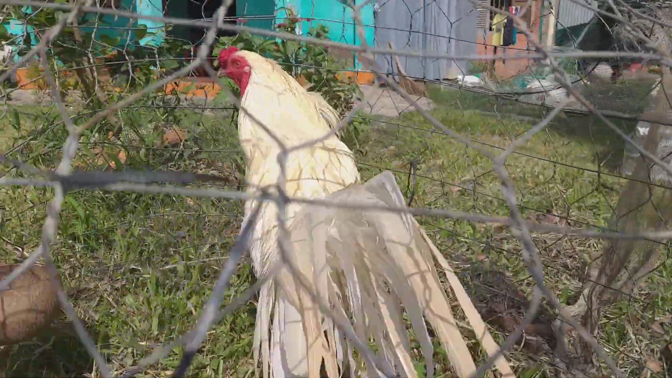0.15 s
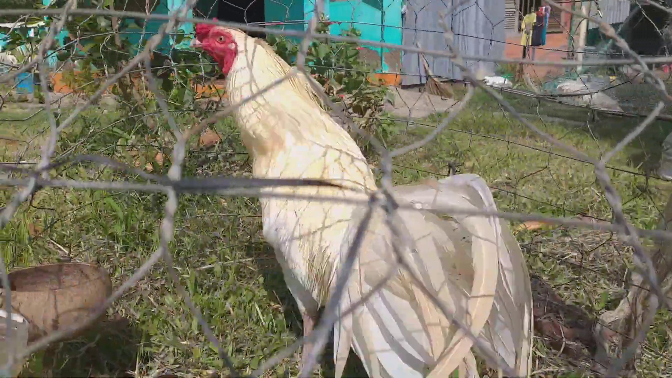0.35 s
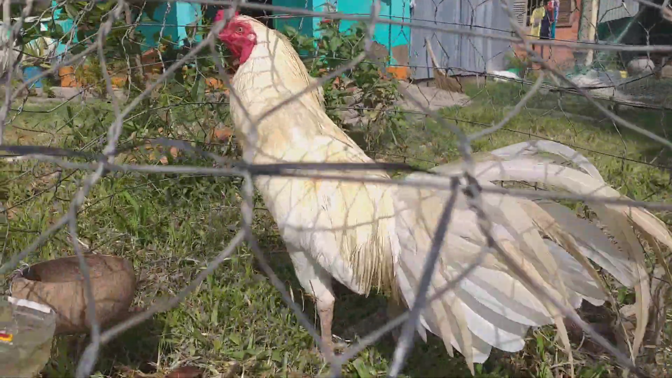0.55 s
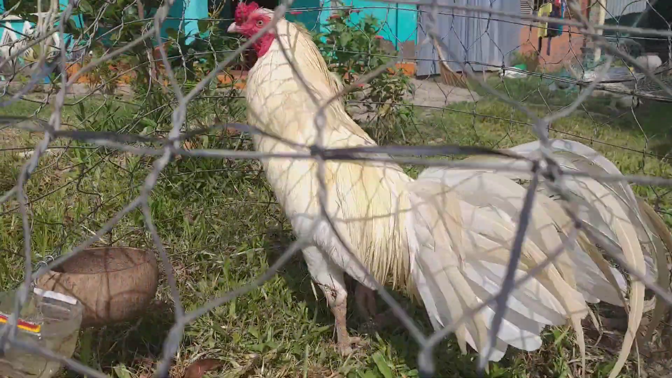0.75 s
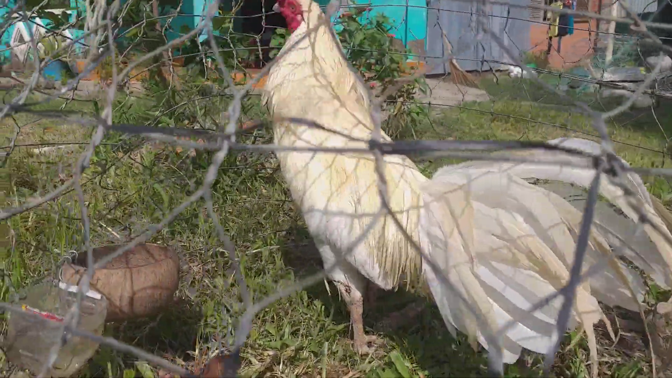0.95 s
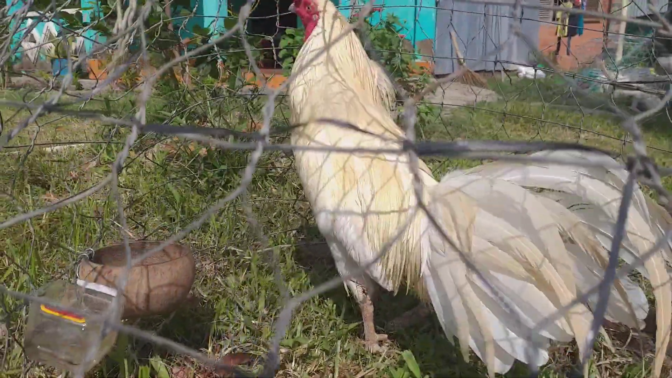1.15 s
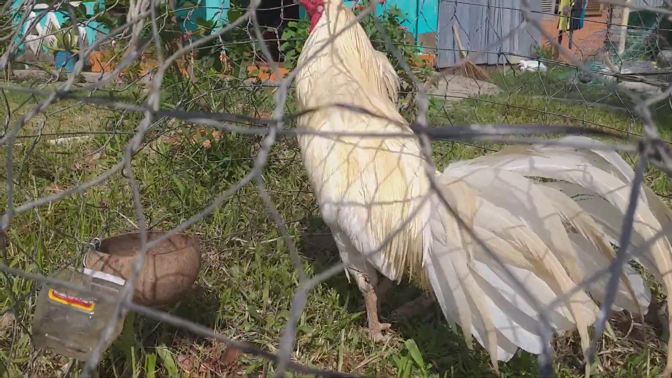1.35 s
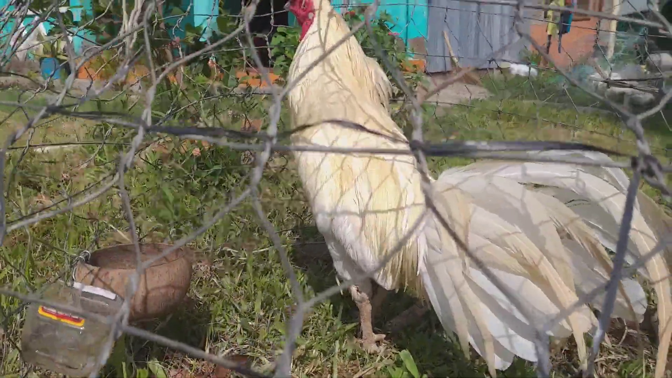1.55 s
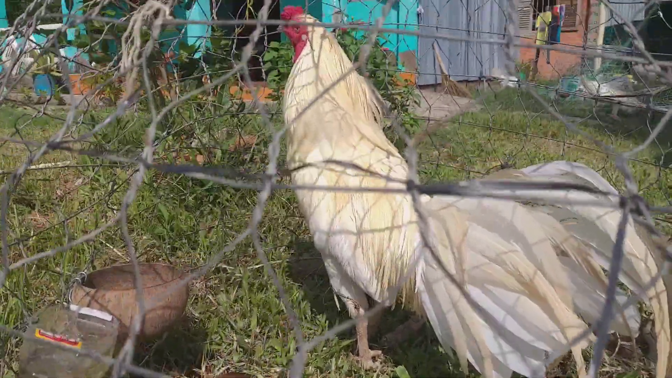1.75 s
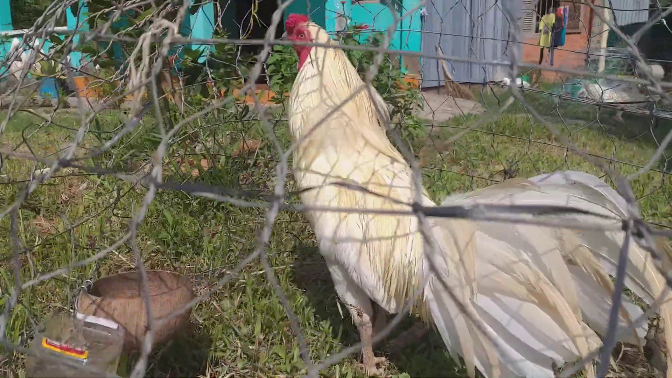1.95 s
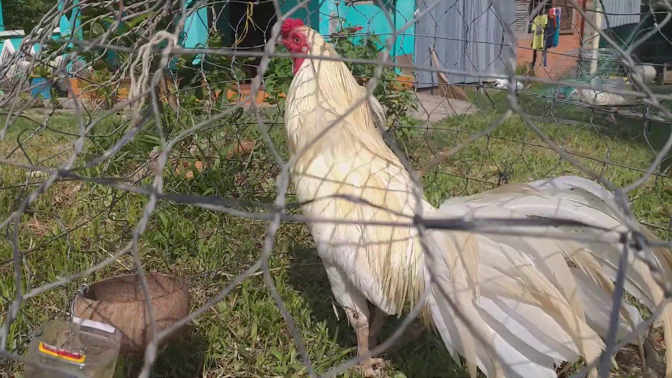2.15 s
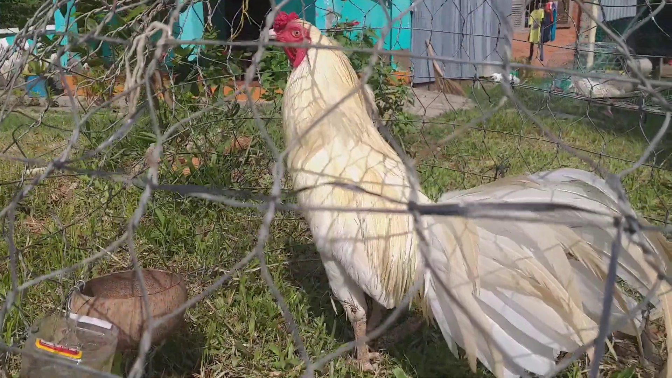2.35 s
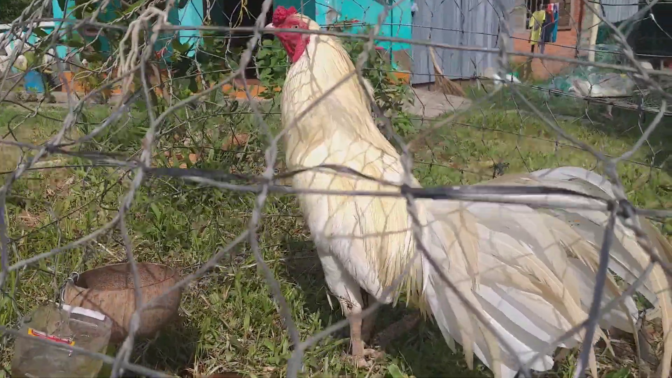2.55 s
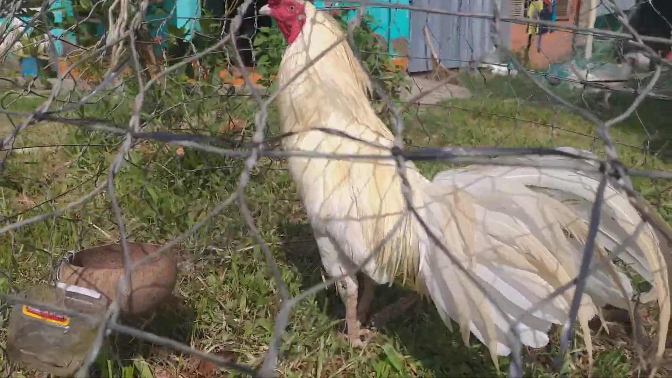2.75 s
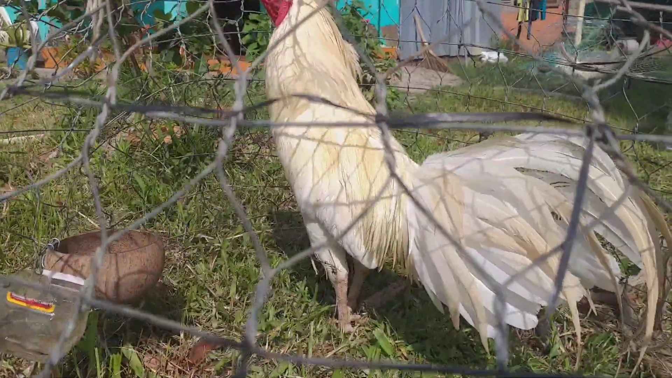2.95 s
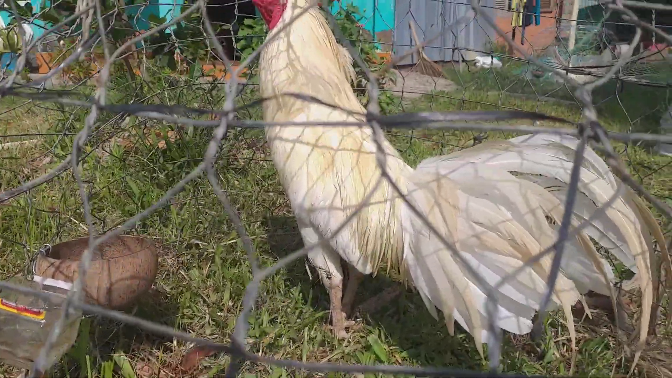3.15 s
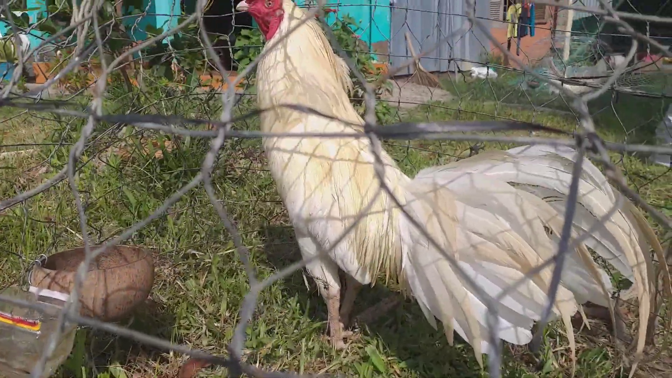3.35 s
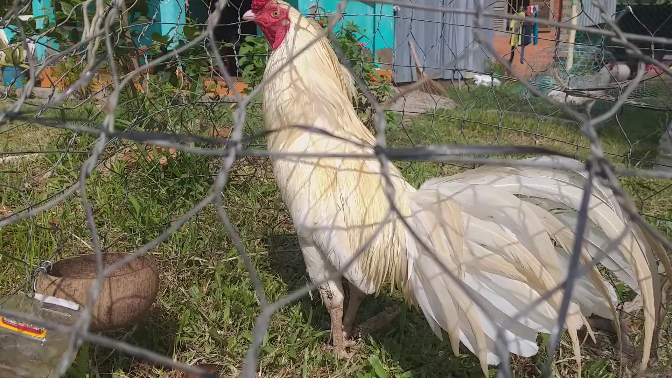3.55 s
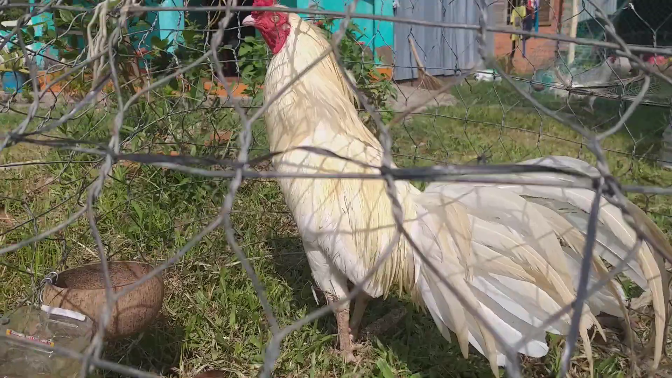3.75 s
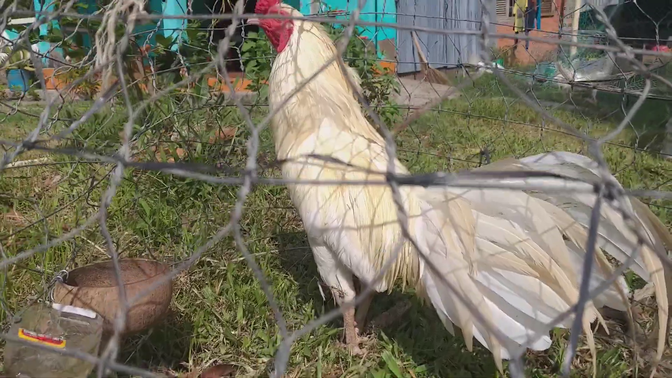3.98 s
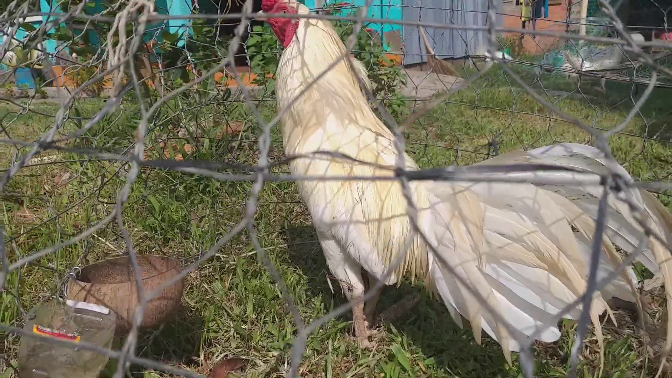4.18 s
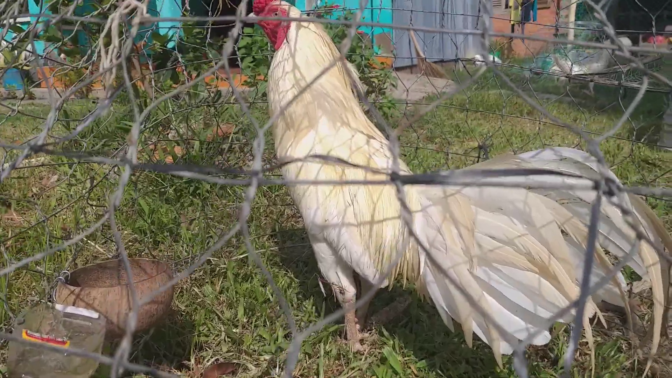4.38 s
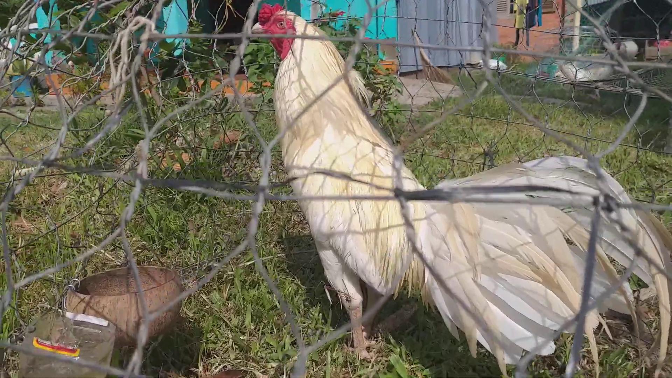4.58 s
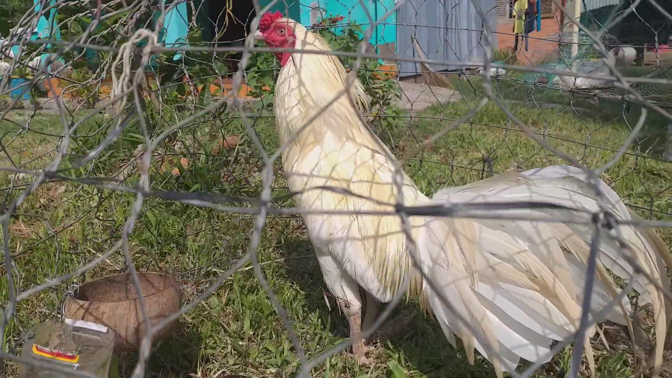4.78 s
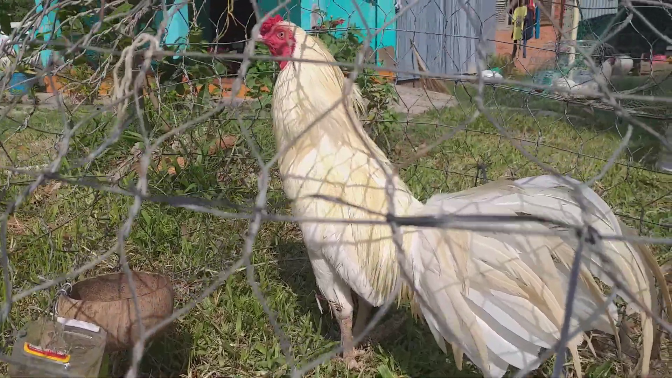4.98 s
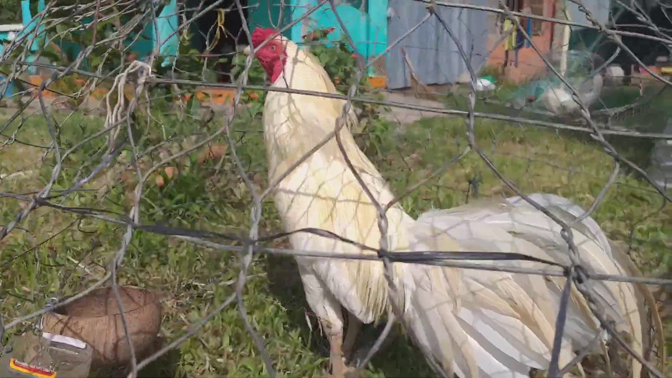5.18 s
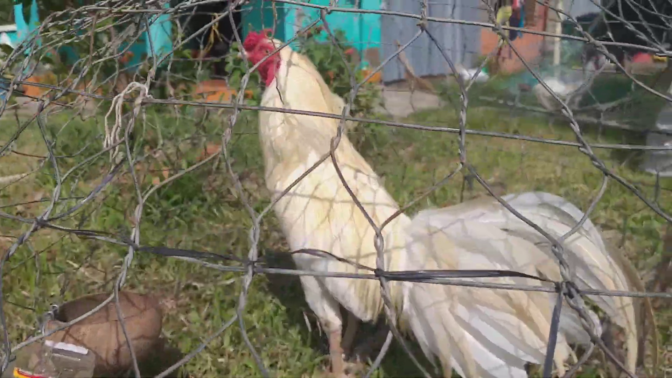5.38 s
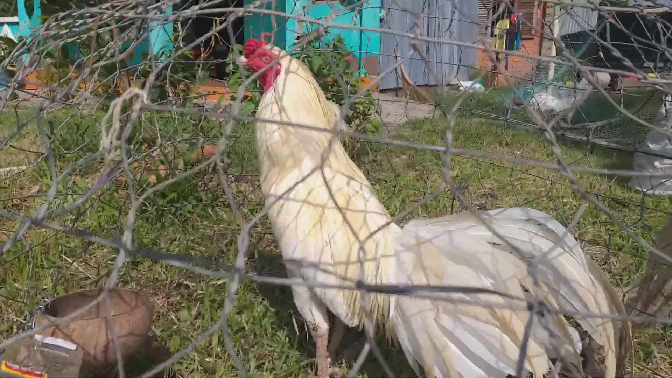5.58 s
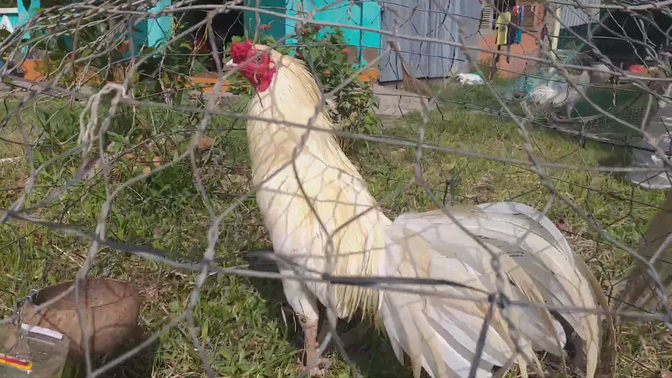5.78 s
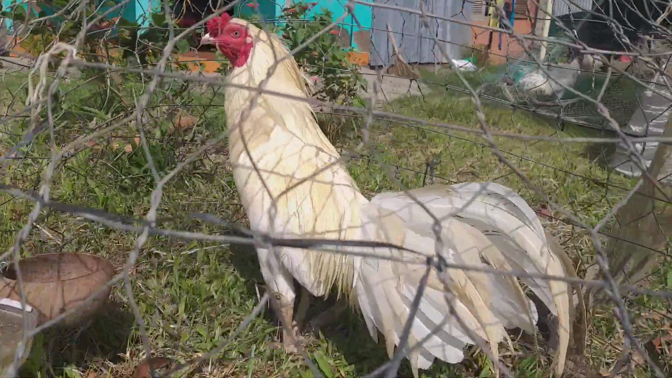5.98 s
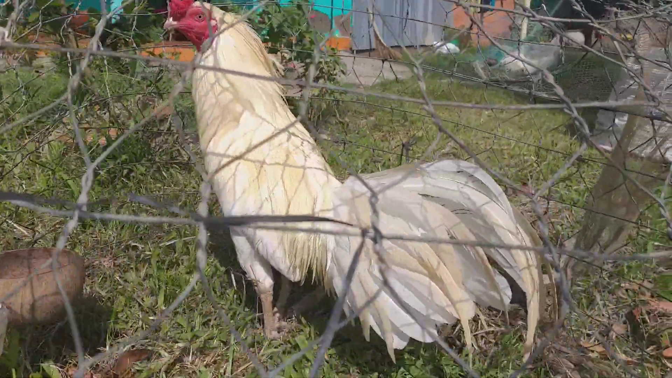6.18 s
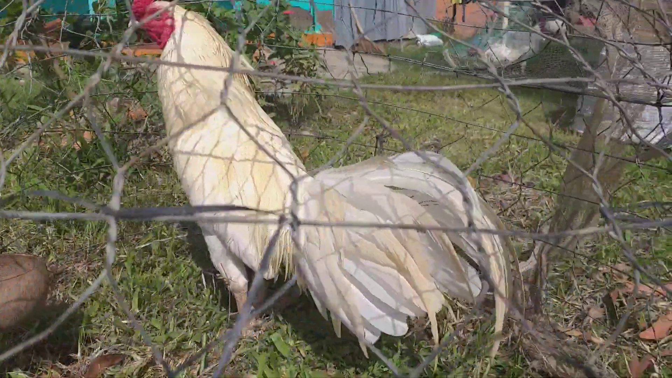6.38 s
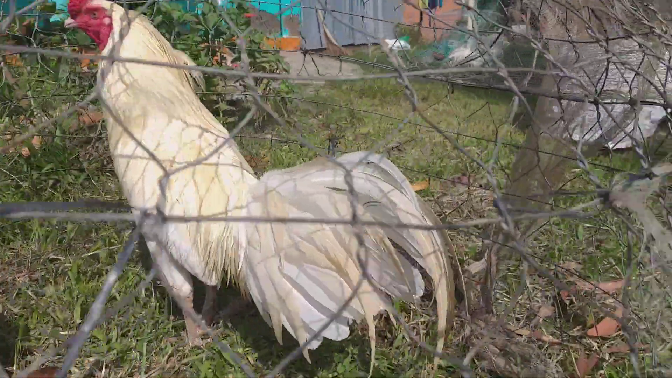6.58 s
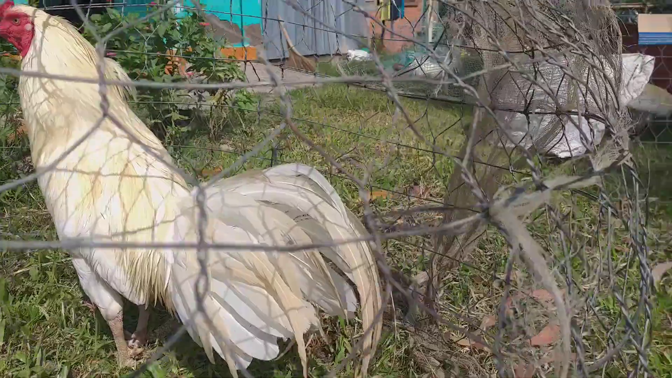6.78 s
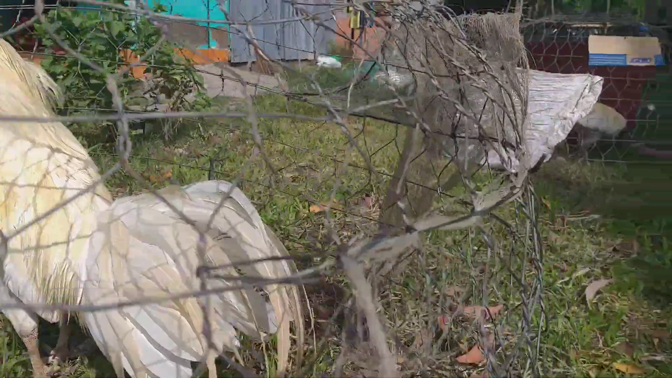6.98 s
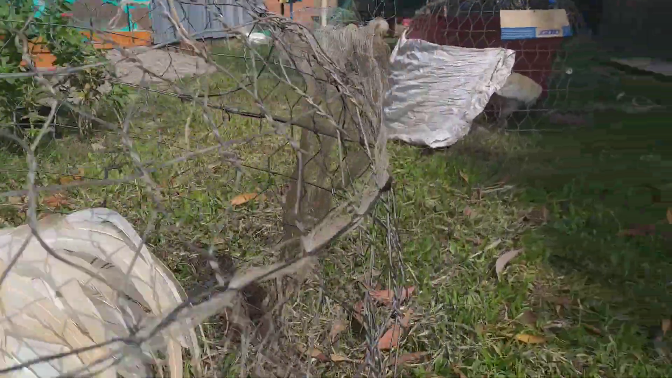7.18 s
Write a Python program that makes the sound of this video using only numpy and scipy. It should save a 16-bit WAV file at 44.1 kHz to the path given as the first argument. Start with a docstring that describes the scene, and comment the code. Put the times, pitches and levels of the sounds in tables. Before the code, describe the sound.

One loud three-note rooster crow outdoors, its tail drooping and echoing faintly, followed by dry rustling, sharp snaps, fence knocks and a tiny bird chirp.

```python
"""Over the hum of a grassy yard, a rooster a metre from a phone crows one three-note crow.
Its voice is a stack of harmonics with short hoarse breaks and breath; it ends in a sinking coo, and sheds echo it.
Then dry grass and feathers rustle and snap as grainy noise, and air puffs thump as low pressure swings.
The wire fence is knocked and rattles: noise bursts, a post thud and ringing wires.
Later a small bird chirps in quick glides, and near the end a wavering far tone hangs over the yard."""
import sys
import numpy as np
from scipy import signal
from scipy.fft import rfft, irfft, next_fast_len
from scipy.io import wavfile
from scipy.ndimage import uniform_filter1d

SR = 44100
rng = np.random.default_rng(int(sys.argv[2]) if len(sys.argv) > 2 else 0)


def nominal_scale(level):
    """Amplitude ratio for a level in decibels (scalar or array-like)."""
    x = np.asarray(level, float) / 20
    return 10 ** x


def transcribe(signal):
    """Save signal, clipped to [-1, 1], as a 16-bit WAV file at the path in sys.argv[1]."""
    frames = np.atleast_2d(signal).T
    limited = np.clip(frames, -1, 1)
    pcm = np.round(limited * 32767).astype(np.int16)
    wavfile.write(sys.argv[1], SR, pcm)


N = 318738
T = np.arange(N) / SR


def level(x, db):
    """Set the average loudness (rms)."""
    return x * nominal_scale(db) / np.sqrt(np.mean(x ** 2))


def colour(x, points):
    """Make some pitches louder than others, by points of (pitch_hz, gain_db)."""
    hz, db = np.transpose(points)
    size = next_fast_len(len(x) + 4096)
    f = np.maximum(np.arange(size // 2 + 1) * SR / size, 1)
    gain = nominal_scale(np.interp(np.log(f), np.log(hz), db))
    return irfft(rfft(x, size) * gain, size)[:len(x)]


def curves(tables):
    """Draw table columns along time, with a gate that is open from first row to last."""
    s, *columns = np.transpose(sorted(row for table in tables for row in table))
    gate = (T >= s[0]) & (T < s[-1])
    return [np.interp(T, s, c) for c in columns], uniform_filter1d(gate * 1., size=151)


def walk(rate):
    """Smooth chance with spread 1 that turns about rate times a second."""
    k = int(SR / rate)
    smooth = uniform_filter1d(rng.standard_normal(N), k)
    return level(uniform_filter1d(smooth, k), 0)


def add(out, s, x):
    """Mix a short sound in at time s."""
    i = int(s * SR)
    out[i:i + len(x)] += x[:N - i]


def fade(t, t60):
    """Exponential decay that falls 60 dB in t60 seconds."""
    return np.exp(-np.log(1000) * t / t60)


def sweeps(rows):
    """Whistled glides: sines whose pitch moves in a straight line, with soft ends."""
    out = np.zeros(N)
    for a, b, from_hz, to_hz, db in rows:
        size = int((b - a) * SR)
        phase = 2 * np.pi * np.cumsum(np.linspace(from_hz, to_hz, size)) / SR
        add(out, a, nominal_scale(db) * np.hanning(size) * np.sin(phase))
    return out


# distant rumble: pitch_hz, relative_level_db
RUMBLE_COLOUR = [(20, -38), (40, -25), (64, -12.5), (98, -2.5), (152, -11), (184, -16.5), (228, -18),
                 (337, -26.5), (450, -33.5), (580, -63)]
# even air hiss: pitch_hz, relative_level_db
AIR_COLOUR = [(240, -36), (400, -6.5), (580, -7), (920, -9), (1300, -8.5), (2140, -14), (2780, -21),
              (3660, -15), (5550, -15.5), (7400, -15), (8700, -10), (9300, -30), (12500, -27.5),
              (15800, -35.5)]
RUMBLE_DB, AIR_DB = -59.5, -68  # rms


def hum():
    """Distant rumble that swells a little, and even air hiss: both are coloured noise."""
    rumble = colour(rng.standard_normal(N), RUMBLE_COLOUR) * nominal_scale(0.38 * walk(13.0))
    air = colour(rng.standard_normal(N), AIR_COLOUR) * nominal_scale(1.3 * walk(4.1))
    return level(rumble, RUMBLE_DB) + level(air, AIR_DB)


# stirs of grass and feathers; body (below 2.5 kHz) and top (above 9.5 kHz) are relative to the stir:
# start_s, end_s, start_level_db, end_level_db, body_db, top_db
STIRS = [(1.746, 1.975, -53.5, -54.5, -15, 1.5), (2.388, 2.56, -54.5, -66, -29, 2),
         (3.46, 3.556, -55, -81, -4.5, -8), (4.123, 4.714, -78, -65, -15, -13),
         (4.9, 5.162, -58, -71, -7.5, -8), (5.185, 5.45, -63, -42, -12, -5.5),
         (5.456, 5.607, -42.5, -37, -6.5, -5.5), (5.66, 5.945, -52.5, -44, -15.5, -3),
         (5.974, 6.261, -61.5, -57, -10.5, -0.5), (6.323, 6.47, -49, -58, -12, 1.5),
         (6.5, 6.96, -64, -51.5, -11.5, -5), (6.95, 7.09, -55.5, -63.5, -7, -7),
         (7.11, 7.23, -72, -67, -1.5, -9.5)]
# sound of the dry grass between body and top: pitch_hz, gain_db
GRASS_COLOUR = [(1470, -44), (2500, -15.5), (3110, -5.5), (3930, -4), (5600, -1), (8120, 0.5), (9200, -5),
                (12000, -60.5), (20200, -120)]
# loud snapping stalks: start_s, peak_db, centre_hz
STALK_SNAPS = [(1.9105, -25.5, 5335), (1.959, -28.5, 7590), (2.3955, -37, 8150), (2.4553, -36, 6880),
               (2.4962, -41, 7720), (3.477, -32, 5600), (3.4993, -33.5, 5590), (3.868, -47, 4430),
               (4.3829, -43, 5370), (4.6134, -37.5, 6920), (5.42, -31.5, 4198), (5.5089, -37, 6245),
               (5.6263, -19, 3860), (5.6432, -31, 4340), (5.681, -33, 8790), (5.9386, -31, 4610),
               (6.077, -26, 14060), (6.9022, -34, 8190), (6.9252, -34, 8460), (7.2005, -34, 7600)]
BREEZE_DB, BREEZE_BODY_DB, BREEZE_TOP_DB = -72, -5, -13.5  # grass that never rests
STIR_ATTACK_S, STIR_RELEASE_S = 0.045, 0.029


def rustle():
    """A hiss broken into uneven grains a few milliseconds long; single stalks snap on top."""
    stir, deep, bright = np.zeros((3, N))
    for a, b, from_db, to_db, body_db, top_db in STIRS:
        shape = nominal_scale(np.interp(T, [a, b], [from_db, to_db]))
        shape = shape * np.clip((T - a) / STIR_ATTACK_S, 0, 1)
        shape = shape * np.exp(-np.maximum(T - b, 0) / STIR_RELEASE_S)
        stir = stir + shape
        deep = deep + nominal_scale(body_db) * shape
        bright = bright + nominal_scale(top_db) * shape
    breeze = nominal_scale(BREEZE_DB + 2.5 * walk(9.9))
    grains = rng.standard_normal(N) * nominal_scale(2.1 * walk(500) + 2.2 * walk(30))
    middle = level(colour(grains, GRASS_COLOUR), 0)
    body = level(colour(grains, [(500, -19), (900, -10.0), (1500, 1.5), (2200, -0.5),
                                 (3000, -25.5), (3500, -57.5)]), 0)
    top = level(colour(grains, [(8500, -47.5), (9500, -19), (11000, -2.5), (12800, 1.5), (15800, -4.5)]), 0)
    out = (stir + breeze) * middle
    out = out + (deep + nominal_scale(BREEZE_BODY_DB) * breeze) * body
    out = out + (bright + nominal_scale(BREEZE_TOP_DB) * breeze) * top

    t = T[:1200]
    snaps = [(s, nominal_scale(db), hz) for s, db, hz in STALK_SNAPS]
    # small snaps at random moments stand above the rustle around them
    for i, u, v in zip(rng.integers(0, N, size=40), *rng.random((40, 2)).T):
        peak = (stir + breeze)[i] * nominal_scale(12.5 + 6.5 * u)
        snaps.append((T[i], peak, 7500 * (.8 + .3 * v)))
    for s, peak, hz in snaps:
        noise = rng.standard_normal(1200) * fade(t, 0.0051)
        snap = colour(noise, [(hz / 6, -29.5), (hz, 0), (hz * 1.6, -10)])
        add(out, s, peak * snap / np.abs(snap).max())
    return out


# the three notes of the crow: start_s, pitch_hz, second_harmonic_db, effort_db
CROW_NOTES = [
    [(0.008, 610, -34.5, -38.5), (0.02, 630, -21, -29), (0.038, 783, -20, -27), (0.048, 830.3, -17, -25.5),
     (0.09, 826, -15.5, -28), (0.11, 826, -15.5, -28.5), (0.146, 733.9, -23.5, -22),
     (0.16, 754, -38, -36.5), (0.176, 734, -31.5, -37.5), (0.185, 727, -39, -37)],
    [(0.192, 585.3, -38, -34), (0.21, 604, -20, -27.5), (0.228, 675.3, -30.5, -25),
     (0.24, 745.7, -17.5, -26.5), (0.338, 758.7, -17, -26.5), (0.452, 765.7, -18.5, -28.5),
     (0.51, 757, -22, -27.5), (0.522, 760.7, -16, -27), (0.73, 754.4, -19, -28),
     (0.75, 723.7, -26.5, -28.5), (0.774, 767, -32, -49), (0.835, 734.2, -38.5, -48.5)],
    [(0.845, 705.7, -22, -46), (0.863, 629.5, -25.5, -33.5), (0.881, 716, -23.5, -25.5),
     (0.897, 731, -13.5, -26.5), (0.913, 747, -17, -26.5), (0.933, 804.6, -23, -20),
     (1.003, 796, -23, -19.5), (1.073, 750.6, -14, -25.5), (1.105, 762.6, -17, -22),
     (1.117, 761.5, -25.5, -20.5), (1.123, 752.6, -23.5, -26), (1.155, 772, -17, -23),
     (1.207, 780.4, -22, -21), (1.335, 748.2, -15.5, -27), (1.369, 751.5, -13.5, -26.5),
     (1.523, 737.8, -21.5, -27), (1.635, 729.2, -23, -27), (1.697, 692.5, -26, -30),
     (1.707, 681, -29.5, -30), (1.713, 652, -31.5, -35.5), (1.729, 516.5, -36.5, -53),
     (1.737, 457, -56, -44.5)],
]
# throat resonances, heard above harmonic 4: pitch_hz, relative_level_db
THROAT_COLOUR = [(3400, -18), (3800, -13), (4300, -17), (5400, 4), (6400, -11.5), (7200, -8.5), (8200, -3),
                 (8900, -14), (9800, -27.5), (11500, -29.5), (13500, -21.5), (15500, -37.5)]
# the membranes lose their rhythm: start_s, end_s, roughness (0-1)
HOARSE_BREAKS = [(.008, .026, .22), (.026, .042, .08), (.118, .125, .08), (.125, .14, .02),
                 (.14, .198, .16), (.198, .238, .06), (.476, .491, .28), (.523, .531, .25),
                 (.628, .644, .17), (.738, .76, .28), (.845, .885, .17), (.885, .928, .04),
                 (1.712, 1.745, .12)]
# how neck and beak are held, levels above effort: start_s, harmonic_1_db, harmonic_3_db, harmonic_4_db,
# harmonics_above_8_db, raise of the lower throat resonances (share)
NECK_POSTURE = [(0, 3.5, 0, 11, -4.5, 0.042), (0.046, 7.5, -2, 8, -9, 0.0042),
                (.118, -2.5, -0.5, 6, -10.5, 0), (.19, 0.5, 1, 1.5, -3, 0.069),
                (.236, 2, -1, 3.5, -5, 0.014), (.84, -7.5, 0, -29.5, -4.5, 0),
                (1.299, -5.5, 7.5, -23, -5.5, 0.033), (1.62, -5, 2.5, -26, 1, 0.17),
                (1.712, 11.5, 3.5, -14.5, -1, 0.2)]
# loss at full roughness: harmonic_1_db, harmonic_2_db, harmonic_4_db
BREAK_LOSS = (-8.5, -17, -38.5)
# short gliding tones beside the crow's own harmonics, perhaps a second membrane:
# start_s, end_s, from_hz, to_hz, level_db before the head's colour
SIDE_GLIDES = [(.735, .795, 1000, 975, -29), (.738, .765, 2150, 1950, -33), (.855, .882, 1300, 1050, -27),
               (.855, .9, 1800, 2100, -35), (.472, .495, 1000, 1100, -22), (.627, .65, 1050, 1150, -26)]
NOTCH_HZ, NOTCH_WIDTH_HZ, NOTCH_DB = 2293, 130, -21  # throat valley that harmonic 3 crosses
RING_HZ, RING_WIDTH_HZ, RING_DB = 3050, 175, 23  # throat ring: harmonic 4, while strong, is weaker off it
# cycles are stronger and weaker in turn by this share, more so for a moment after a break
DOUBLING, DOUBLING_AFTER_BREAK, DOUBLING_S = .01, .8, .025


def rooster():
    """Harmonics on one membrane phase; breaks shake its period and size, breath hisses once a cycle."""
    (hz, second_db, effort_db), gate = curves(CROW_NOTES)
    start, *held = np.transpose(NECK_POSTURE)
    row = np.searchsorted(start, T, "right") - 1
    first, third, fourth, high, raised = (uniform_filter1d(a[row], size=441) for a in held)
    rough = sum(r * ((T > a) & (T < b)) for a, b, r in HOARSE_BREAKS)
    rough = uniform_filter1d(rough, size=220) + .005

    # the four lowest harmonics have levels of their own
    notch = NOTCH_DB * np.exp(-((3 * hz - NOTCH_HZ) / NOTCH_WIDTH_HZ) ** 2 - 6 * rough)
    ring = RING_DB * (np.exp(-((4 * hz - RING_HZ) / RING_WIDTH_HZ) ** 2) - 1) * (fourth > 0)
    low_db = (effort_db + first + BREAK_LOSS[0] * rough,
              second_db + BREAK_LOSS[1] * rough,
              effort_db + third + notch,
              effort_db + fourth + ring + BREAK_LOSS[2] * rough)
    shaken_hz = hz * (1 + .4 * rough * walk(650) + .0015 * walk(25))
    phase = 2 * np.pi * np.cumsum(shaken_hz) / SR
    tone = sum(nominal_scale(db) * np.cos((k + 1) * phase) for k, db in enumerate(low_db))

    # the throat shapes the higher harmonics
    mid_db, high_db = effort_db - 2.0, effort_db + high
    f, throat_db = np.transpose(THROAT_COLOUR)
    for orders, db in ((range(5, 9), mid_db), (range(9, 21), high_db)):
        stack, power = 0, 0
        for k in orders:
            # each high harmonic shimmers alone as the neck and beak move
            throat_hz = k * hz / (1 + raised * np.clip((9000 - k * hz) / 2000, 0, 1))
            gain = nominal_scale(np.interp(np.log(throat_hz), np.log(f), throat_db) + 3.3 * walk(9))
            flutter = 1 + 0.02 * k * walk(120)
            angle = k * phase + 0.47 * k * k + .09 * max(k - 11, 0) * walk(250)
            stack = stack + gain * flutter * np.sin(angle)
            power = power + gain ** 2
        tone = tone + nominal_scale(db) * stack / np.sqrt(power)

    keep = np.exp(-1 / (DOUBLING_S * SR))
    lingering = signal.lfilter([1 - keep], [1, -keep], rough)
    doubling = DOUBLING + DOUBLING_AFTER_BREAK * lingering
    tone = np.sqrt(2) * tone * (1 + doubling * np.cos(phase / 2))
    tone = tone * (1 + 0.42 * rough * walk(210))

    breath_colour = [(250, -12), (900, -8.0), (2200, -10.5)] + THROAT_COLOUR[1:]
    hiss = level(colour(rng.standard_normal(N), breath_colour), 0)
    breath = hiss * (nominal_scale(mid_db - 30.0) + nominal_scale(high_db - 25.5))
    breath = breath * nominal_scale(25 * rough) * (1 + 0.35 * np.cos(phase))
    # so small a head radiates little that is low, and the beak leaves gaps near 4 and 10 kHz
    head = [(200, -21.5), (300, -5), (400, -3.5), (520, 1.5), (3300, 1.5), (4200, -3), (5000, 0),
            (9100, 0), (9800, -5), (12000, -1.5)]
    return colour(gate * (tone + breath) + sweeps(SIDE_GLIDES), head) + coo()


# single echoes from ground and sheds: delay_s, level_db
SINGLE_ECHOES = [(.0031, -26.5), (.021, -15.5), (.047, -16), (.083, -25)]
YARD_T60_S, YARD_DB = 0.89, -59  # diffuse tail; its rms before it fades


def yard(x):
    """A few single echoes and a thin diffuse tail of fading noise."""
    t = T[:SR]
    tail = colour(rng.standard_normal(SR), [(500, 0.5), (1500, -5.0), (2300, 2.0), (3500, -2.5),
                                            (8000, -12.5), (16000, -23.0)])
    response = level(tail, YARD_DB) * fade(t, YARD_T60_S) * (t > .012)
    response[0] = 1  # the direct sound
    for lag, db in SINGLE_ECHOES:
        response[int(lag * SR)] += nominal_scale(db)
    return signal.fftconvolve(x, response)[:N]


COO_S, COO_HZ, COO_REST_HZ, COO_SETTLE_S = 1.733, 720, 548, 0.037  # start, first and resting pitch, glide
COO_DB, COO_T60_S, COO_HALF_DB = -33.5, 0.37, -27  # the undertone's level is relative to the coo


def coo():
    """The breath runs out on a faint, hoarse, sinking tone with a half-pitch undertone."""
    t = np.maximum(T - COO_S, 0)
    hz = COO_REST_HZ + (COO_HZ - COO_REST_HZ) * np.exp(-(t / COO_SETTLE_S) ** 2)
    hz = hz * (1 + np.minimum(.02 + t, .09) * walk(300))  # grows hoarser
    phase = 2 * np.pi * np.cumsum(hz) / SR
    half = nominal_scale(COO_HALF_DB) * np.minimum(t / 0.063, 1) ** 2 * fade(t, 1.156) * (t < .26)
    half = half * np.sin(np.pi * COO_REST_HZ * t)
    tone = np.minimum(t / 0.0062, 1) * fade(t, COO_T60_S) * np.sin(phase)
    return nominal_scale(COO_DB) * (tone + half)


# air puffs on the microphone: start_s, level_db, pitch_hz, rise_s
AIR_PUFFS = [(2.136, -40.5, 112, 0.011), (2.16, -41, 75.8, 0.01), (2.349, -56, 59, 0.0089),
             (2.433, -45.5, 131.7, 0.0066), (2.608, -45, 120.6, 0.015), (2.66, -43.5, 156, 0.025),
             (2.698, -43, 112, 0.017), (3.031, -46, 86.1, 0.0097), (3.059, -39, 141.6, 0.0061),
             (4.173, -54, 105, 0.01), (6.498, -49, 95, 0.03)]


def puffs():
    """A low pressure swing that rises and dies away, with turbulence riding on it."""
    out, t = np.zeros(N), T[:6000]
    for s, db, hz, rise in AIR_PUFFS:
        eddies = colour(rng.standard_normal(6000), [(20, -4), (60, 10.0), (300, 2.5), (450, -35.0)])
        swing = np.sin(2 * np.pi * hz * t) + level(eddies, -6.0)
        add(out, s, nominal_scale(db) * swing * (t / rise) * np.exp(1 - t / rise))
    return out


# knocks on the fence and their bounces, crack before colouring, tail relative to the crack:
# start_s, crack_db, post_thud_db, tail_db
FENCE_KNOCKS = [(2.66, -26, -24, -3.5), (2.6674, -23.5, -35, -0.5), (2.6769, -32, -47, -28.5),
                (2.6964, -16, -53, -22.5), (2.7134, -33.5, -60, -40), (3.425, -47.5, -43, -1),
                (4.7245, -32, -29, -45), (4.7306, -24.5, -32, -0.5), (4.7427, -22, -50, -38),
                (4.7619, -26, -52, -30), (6.4812, -19.5, -25.5, -6), (6.488, -13.5, -23.5, -9.5),
                (6.5044, -26, -52, -6), (6.5176, -19.5, -47, -37), (6.5326, -38, -44, -21)]
# wire modes, and how strongly each of the four struck places rings them:
# pitch_hz, t60_s, place_1_db, place_2_db, place_3_db, place_4_db
WIRE_MODES = [(1927, .4, -10, -10, -7, -12), (2225, .5, -16, 5, -14, -8), (3450, .45, -6, -14, -12, -5),
              (4522, .25, -8, -14, -12, -8), (5000, .5, -9, -12, -12, -16), (5453, .55, -11, 6, 6, -14),
              (5841, .6, -6, 0, -4, 1), (8990, .45, -8, -25, -16, -20), (10130, .35, -25, -25, -13, -14),
              (10800, .35, -25, -25, -16, -14), (12830, .5, -6, -25, -11, -11)]
# sound of the rattling mesh: pitch_hz, gain_db
RATTLE_COLOUR = [(350, -46), (600, -31.5), (833, -25.5), (1290, -21), (2260, -15), (2630, -12.5),
                 (5660, -7.5), (6490, -11.5), (9020, -19.5), (9650, -25), (13000, -22.5), (15800, -38)]
POST_HZ, POST_T60_S = 1960, 0.014
TREBLE_DB, TREBLE_DB_PER_S, TREBLE_MAX_DB = -4, 450, 7  # later bounces are brighter


def fence():
    """Each knock: a crack, a thud of the post, wire modes weighted by the struck place, the mesh rattling on."""
    out, top, t = np.zeros(N), np.zeros(N), T[:SR]
    f, t60, *place_db = np.transpose(WIRE_MODES)[:, :, None]
    rings, thuds = np.zeros((len(f), N)), np.zeros(N)
    # a pause over 0.3 s means the next struck place
    places = np.cumsum(np.diff(np.array(FENCE_KNOCKS)[:, 0], prepend=0) > .3) - 1
    for (s, db, thud_db, tail_db), place in zip(FENCE_KNOCKS, places):
        since = s - FENCE_KNOCKS[list(places).index(place)][0]
        treble_db = min(TREBLE_DB + TREBLE_DB_PER_S * since, TREBLE_MAX_DB)
        crack = 2.2 * fade(t, 0.015)
        tail = nominal_scale(tail_db) * fade(t, 0.66) * np.minimum(t / 0.008, 1)
        burst = nominal_scale(db) * rng.standard_normal(SR) * (crack + tail)
        add(out, s, burst)
        add(top, s, burst * nominal_scale(treble_db) * fade(t, 0.88))
        add(thuds, s, nominal_scale(thud_db) * np.sin(2 * np.pi * POST_HZ * t) * fade(t, POST_T60_S))
        ring = nominal_scale(place_db[place] + db + tail_db - 14) * np.sin(2 * np.pi * f * (s + t)) * fade(t, t60)
        add(rings.T, s, ring.T)
    rattle = colour(out * nominal_scale(2 * walk(248)), RATTLE_COLOUR) * nominal_scale(1)
    treble = colour(top, [(8000, -48.0), (10000, -28), (12800, -24), (15800, -44.5)])
    post = colour(thuds, [(700, -25), (1500, 0)])
    # touching wires make every mode flutter
    wires = sum(ring * (.7 + .5 * walk(150)) for ring in rings)
    return rattle + treble + post + wires


# small birds, one row a sweep: start_s, end_s, from_hz, to_hz, level_db before flutter and smear
BIRD_CHIRPS = [(3.17, 3.215, 3680, 3550, -77), (3.31, 3.39, 4090, 3800, -77.5),
               (3.69, 3.745, 3450, 3350, -75), (3.822, 3.845, 6500, 5100, -55.5),
               (3.845, 3.868, 5400, 4470, -55.5), (3.829, 3.845, 3335, 4530, -55),
               (3.865, 3.888, 4850, 3810, -49), (3.89, 3.914, 3090, 4420, -53.5),
               (3.913, 3.935, 4320, 2986, -60), (4.32, 4.36, 3470, 3330, -71)]
# wavering far tone: start_s, pitch_hz, level_db
FAR_TONE_PATH = [(5.66, 2000, -67), (5.85, 2050, -58), (5.92, 2085, -54), (6.0, 2040, -59),
                 (6.1, 2020, -57), (6.22, 2025, -64), (6.34, 1964, -75)]


def birds():
    """Quick chirps, smeared by distance, and a wavering far tone: all are gliding sines."""
    out = sweeps(BIRD_CHIRPS) * nominal_scale(2 * walk(152.5))
    smear = rng.standard_normal(SR // 2) * fade(T[:SR // 2], 0.4) * nominal_scale(-26.5)
    (hz, db), gate = curves([FAR_TONE_PATH])
    phase = 2 * np.pi * np.cumsum(hz * (1 + 0.0194 * walk(145))) / SR
    far = gate * nominal_scale(db + 3.3 * walk(40)) * np.sin(phase)
    return out + signal.fftconvolve(out, smear)[:N] + far


# the left port hears this band a little louder: pitch_hz, gain_db
LEFT_LEAN = [(900, -51), (1300, -20.5), (1700, -14), (2200, -28), (2800, -54)]
# later arrivals that differ left and right: pitch_hz, gain_db
PORT_DIFFERENCE = [(25, -34.5), (60, -41), (200, -43), (400, -32), (900, -33), (1500, -26), (2400, -14),
                   (3000, -23), (6000, -31.5), (10000, -20), (15000, -20)]


def scene():
    """All sources lie ahead; the two ports differ only slightly, most near 2 kHz."""
    mid = yard(rooster() + fence() + rustle()) + puffs() + birds() + hum()
    late = np.roll(mid, shift=130)
    side = colour(mid, LEFT_LEAN) + colour(late, PORT_DIFFERENCE)
    return np.array([mid + side, mid - side])


def band_limit(x):
    """A steep low-pass at the top of the band."""
    return signal.sosfilt(signal.butter(12, 16980, fs=SR, output="sos"), x)


def record(dry):
    """The phone cuts the top with a steep low-pass at 15850 Hz."""
    top_cut = signal.ellip(8, .2, 70, 15850, fs=SR, output="sos")
    mix = signal.sosfilt(top_cut, dry)
    return band_limit(mix)


dry = scene()
out = record(dry)
transcribe(out)
```